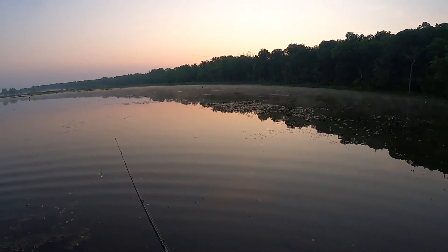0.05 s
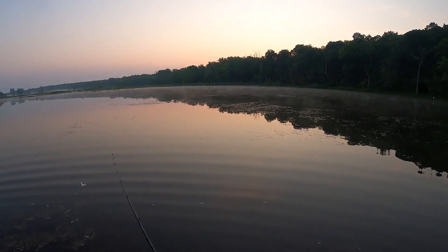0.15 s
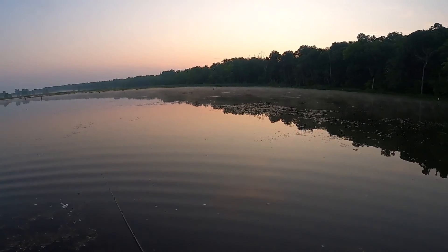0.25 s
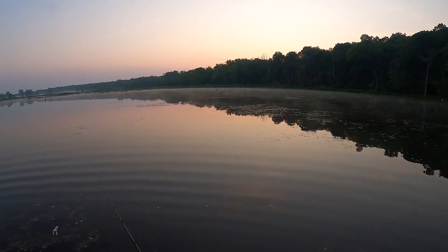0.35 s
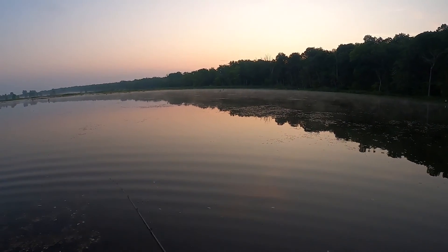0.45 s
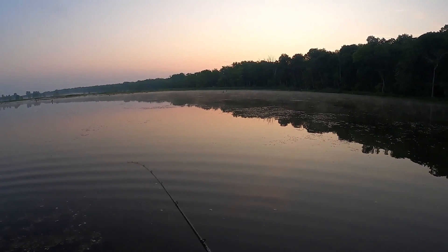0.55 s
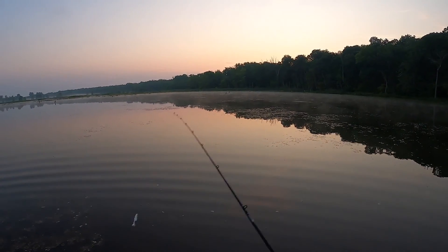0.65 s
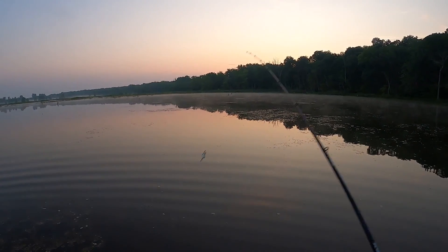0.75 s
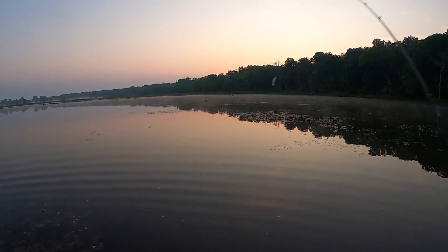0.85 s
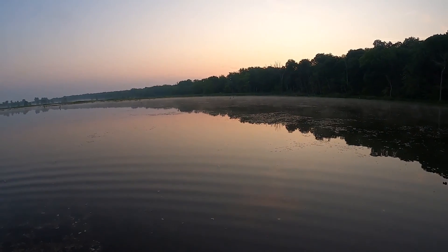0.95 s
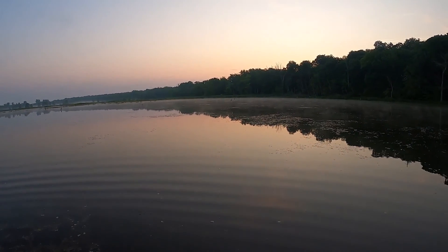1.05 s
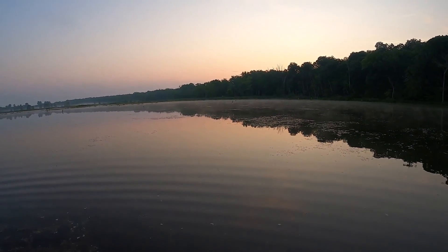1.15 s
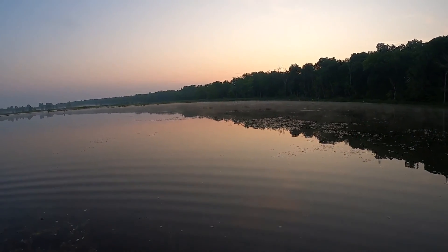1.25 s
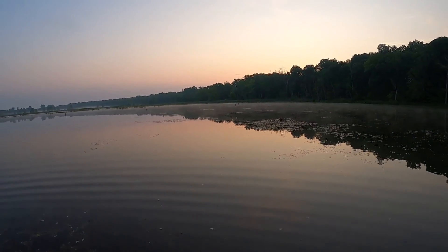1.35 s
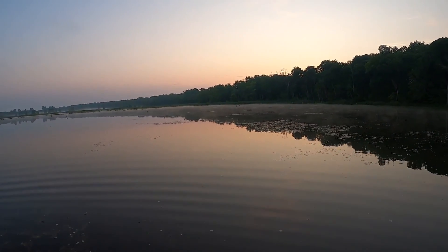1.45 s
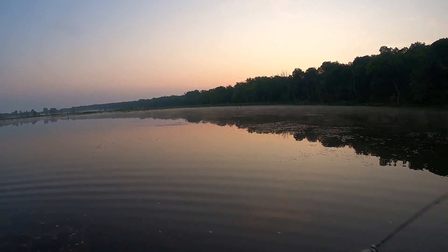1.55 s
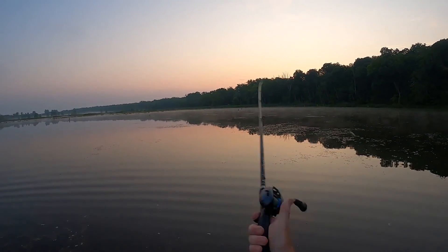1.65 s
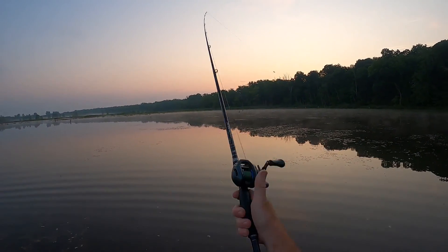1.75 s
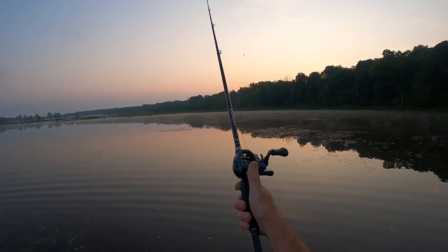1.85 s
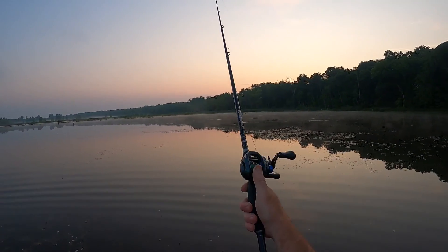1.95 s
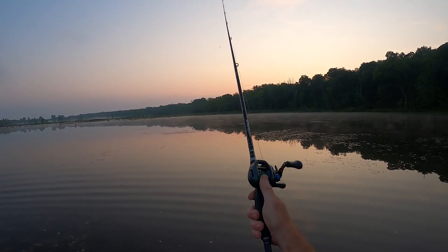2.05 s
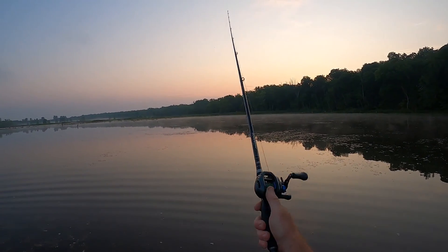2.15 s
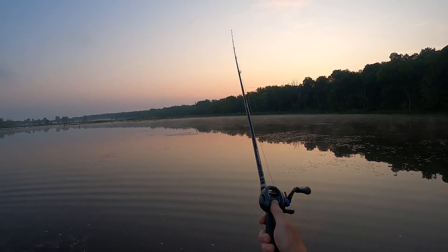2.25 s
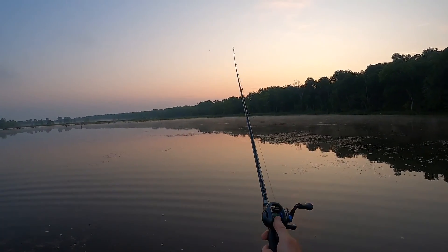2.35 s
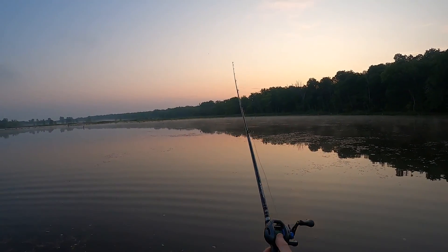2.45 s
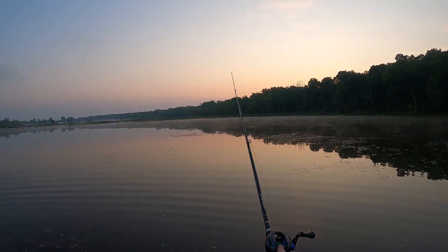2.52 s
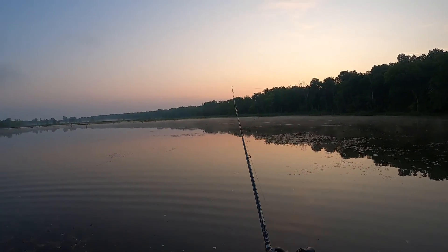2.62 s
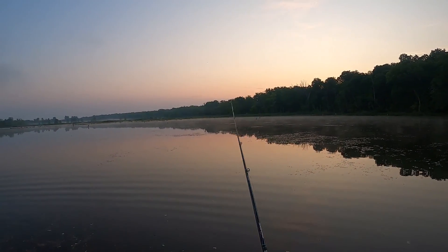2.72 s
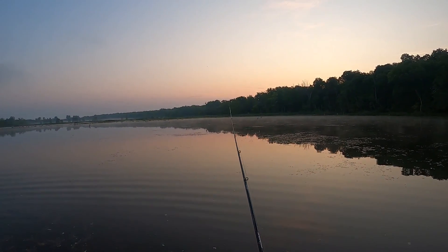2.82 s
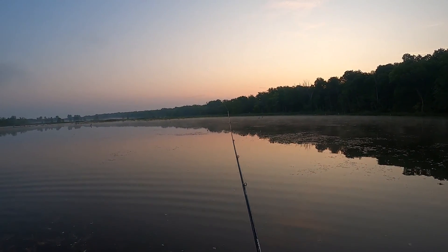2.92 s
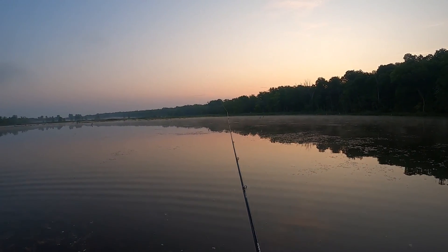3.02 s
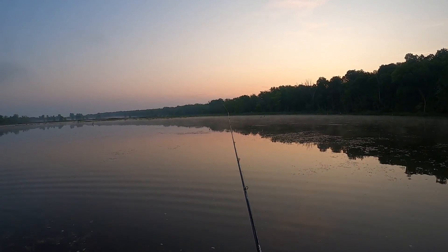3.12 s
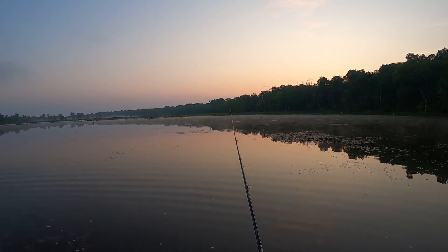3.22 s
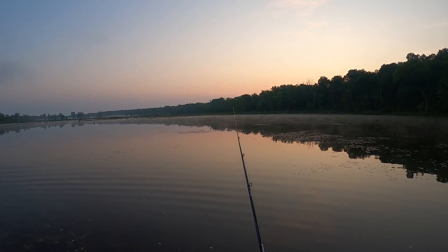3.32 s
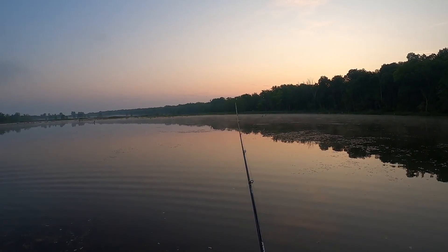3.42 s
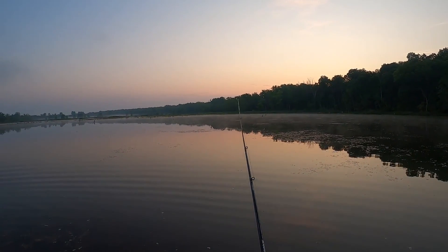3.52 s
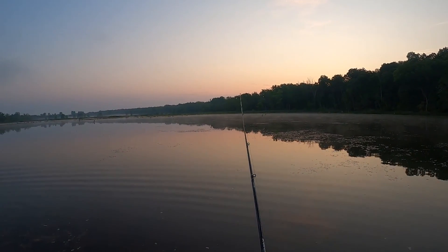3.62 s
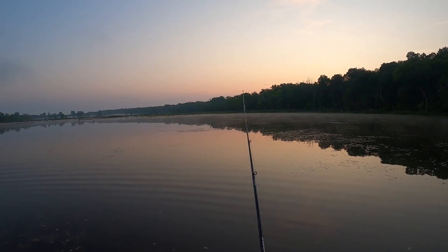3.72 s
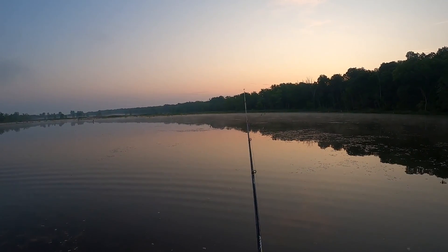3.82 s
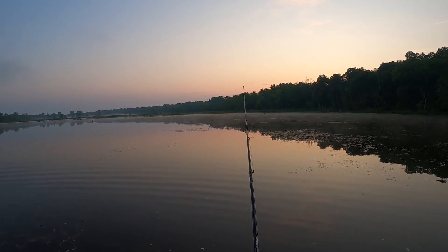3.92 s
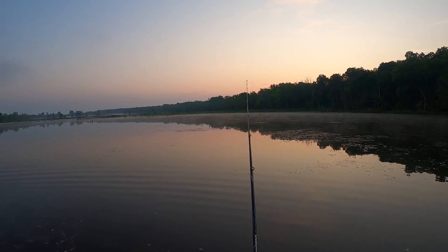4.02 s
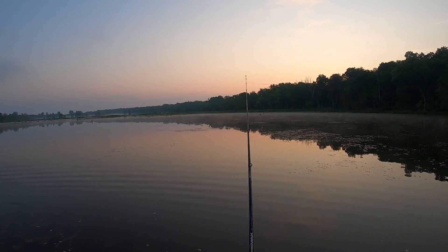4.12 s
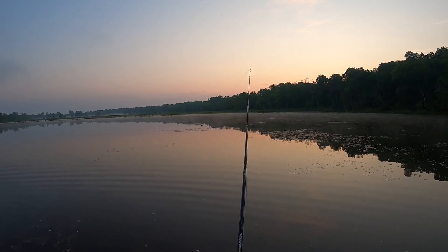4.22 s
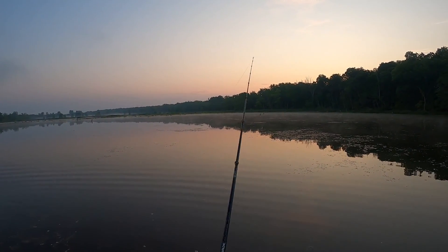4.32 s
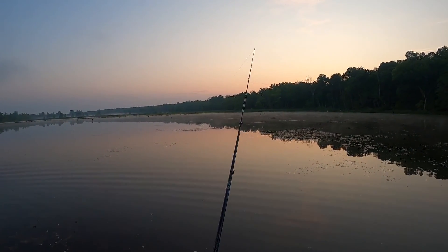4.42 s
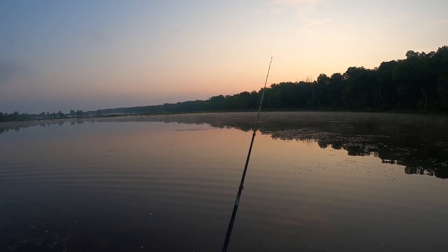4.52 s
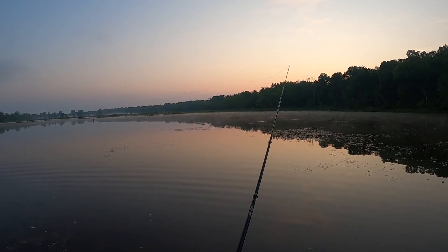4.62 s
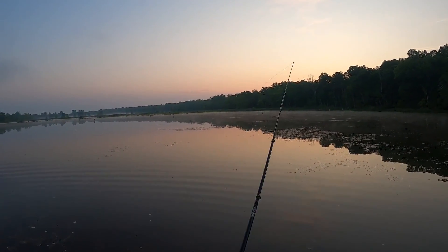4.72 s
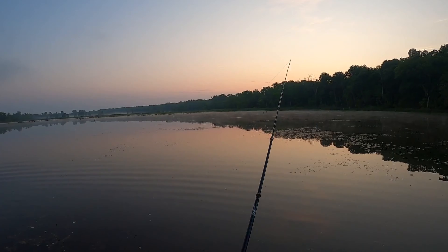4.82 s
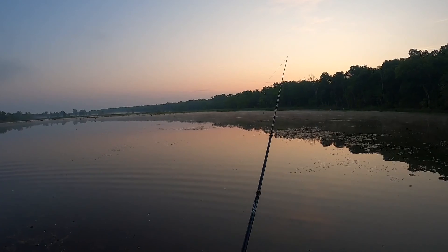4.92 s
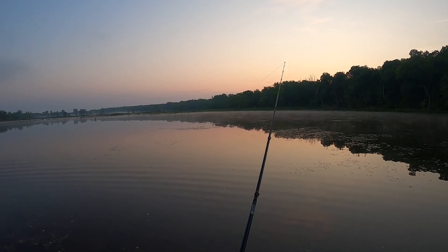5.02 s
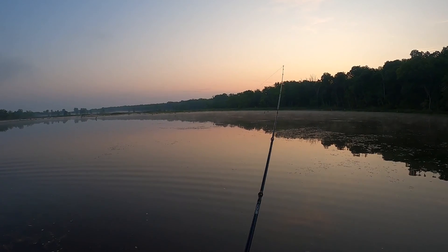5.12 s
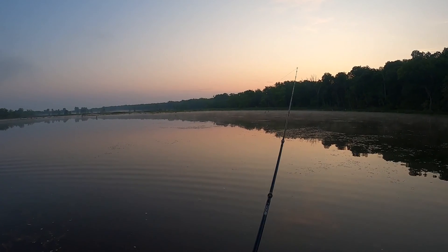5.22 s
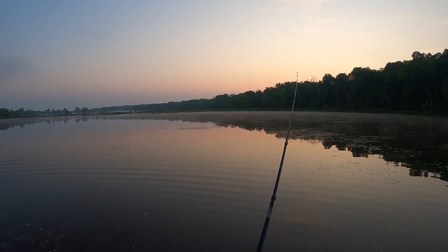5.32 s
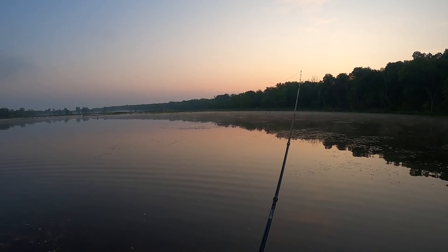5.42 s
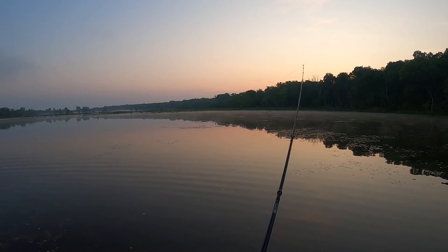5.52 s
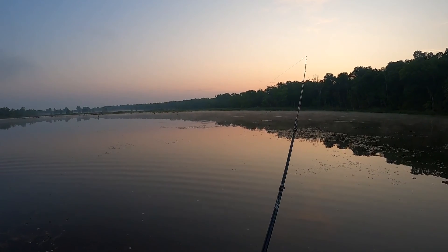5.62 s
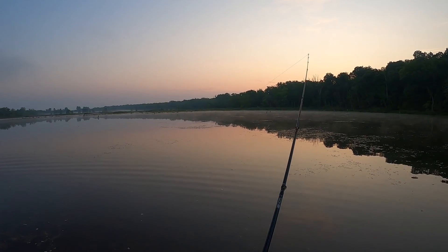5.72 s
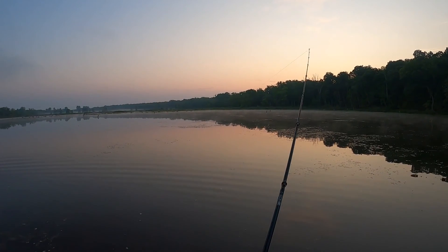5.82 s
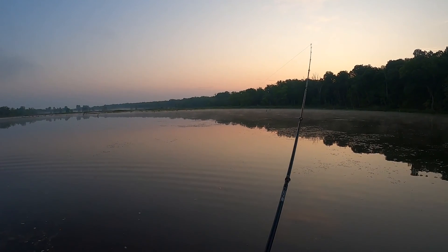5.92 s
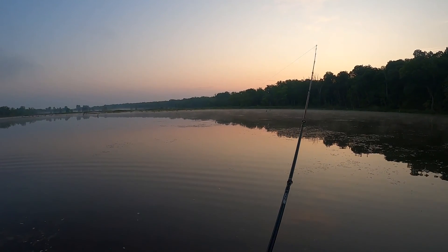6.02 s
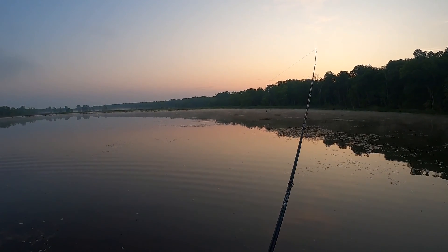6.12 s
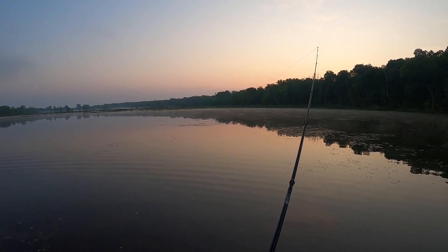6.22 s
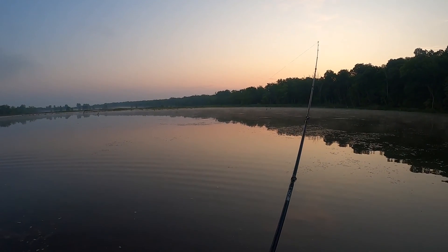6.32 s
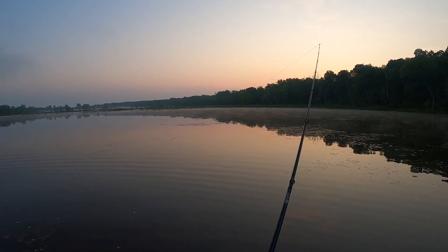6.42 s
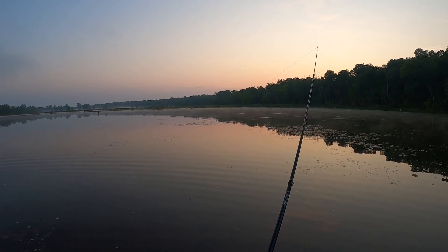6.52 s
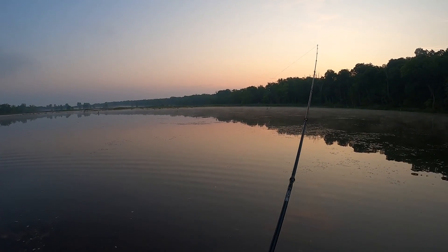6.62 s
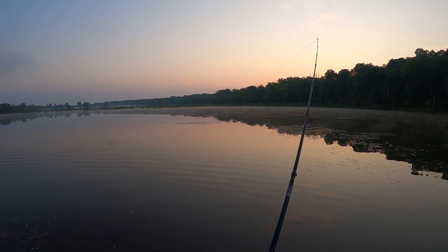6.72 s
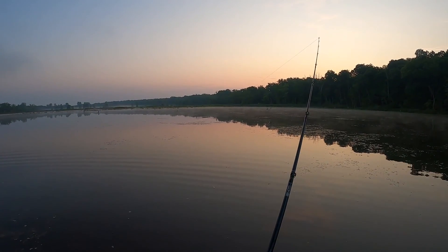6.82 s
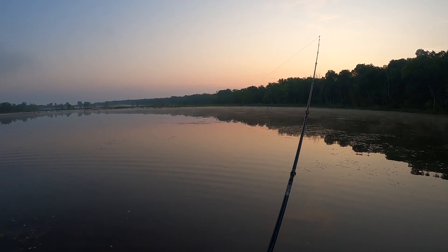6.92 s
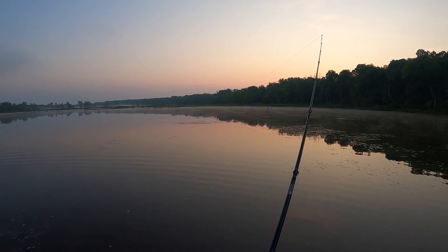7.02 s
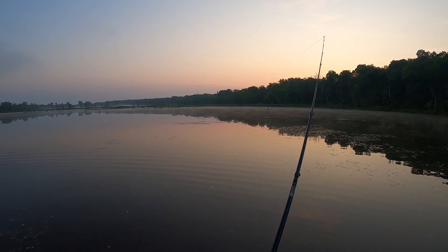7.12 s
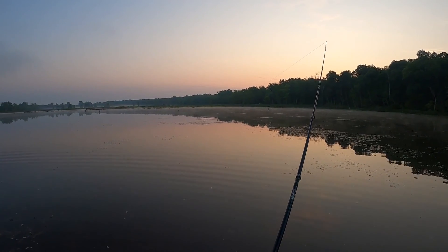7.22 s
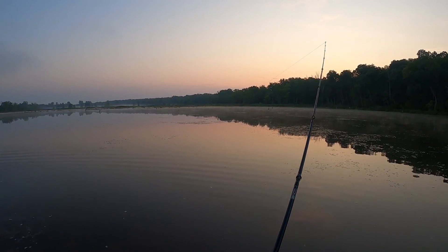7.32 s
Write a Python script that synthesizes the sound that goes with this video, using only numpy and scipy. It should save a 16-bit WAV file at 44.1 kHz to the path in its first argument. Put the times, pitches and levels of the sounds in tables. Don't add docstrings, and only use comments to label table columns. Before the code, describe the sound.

A fishing cast heard from the angler's position: one crisp reel click, cloth rustle, a quick whoosh, then a rattling spool whine sliding down in pitch while line hisses through guides and fades. Light metal ticks and hollow rod taps follow, then the sharpest clack as the gears engage. Soft winding continues. Lake birds, croaking frogs and one far drumming woodpecker sit faintly over deep, uneven engine rumble, nearly mono at first, gradually widening.

```python
import sys
import numpy as np
from scipy import signal
from scipy.fft import rfft, irfft, next_fast_len
from scipy.io import wavfile
from scipy.ndimage import uniform_filter1d, map_coordinates

SR = 44100
rng = np.random.default_rng(int(sys.argv[2]) if len(sys.argv) > 2 else 0)


def gain_from_db(level_db):
    decades = np.asarray(level_db, float) / 20
    return 10 ** decades


def master(y):
    cut = np.clip(np.atleast_2d(y).T, -1, 1)
    pcm = np.round(cut * 32767)
    wavfile.write(sys.argv[1], SR, pcm.astype(np.int16))


N = 324699

# time in seconds, turns per second.
SPIN = [(1.72, 300), (1.796, 300), (1.85, 328), (1.892, 342), (1.98, 305.5), (2.03, 300), (2.075, 278),
        (2.196, 240), (2.33, 221), (2.408, 203), (2.52, 191), (2.612, 172), (2.72, 163.5), (2.86, 141),
        (3.134, 120), (3.47, 99), (3.65, 98), (4.02, 80)]
# order, level in dB, dB per tenfold speed, turns per second below which it is lost.
SHAFT = [(1, -2, 5, 285), (2, 0, 90, 205), (3, -12, 25, 185), (4, -4, 105, 150)]
# centre in Hz, width in Hz, level in dB.
FRAME = [(2200, 200, 1), (2790, 280, 1.5), (3284, 260, -7), (2500, 160, -6), (4900, 120, -16),
         (5000, 150, -25)]
# frequency in Hz, density in dB per Hz.
HISS = [(2120, -32), (3300, -4.5), (4100, -11), (4900, -10), (5510, 0.5), (6340, -10.5), (7580, -14.5),
        (9700, -15.5), (11800, -24.5), (13000, -20), (15700, -44.5)]
# frequency in Hz, density in dB per Hz.
WINDAGE = [(150, -27.5), (300, -3), (700, -8), (1400, 0), (1900, 3), (2600, -25.5), (3600, -20), (4400, -3),
           (5000, -12), (5600, -30)]
# peak in seconds, level in dB, rise and fall in seconds per 20 dB.
JOLTS = [
    (1.745, -40.5, 0.11, 0.023),
    (1.84, -51.5, 0.071, 0.039),
    (2.75, -66.5, 0.13, 0.082),
    (3.8, -70.5, .55, 0.52),
]
# peak in seconds, dB over the hiss, rise and fall in seconds per 20 dB.
SURGES = [
    (2.03, -2, .1, .1),
    (2.22, 2.5, .09, .12),
    (2.41, 2.5, .12, .05),
    (2.53, 1, .05, .05),
    (2.62, 2, .08, .03),
]
# peak in seconds, level in dB, rise and fall in seconds per 20 dB.
GUIDE = (2.6, -61, 1.3, .06)
# peak in seconds, level in dB, rise and fall in seconds per 20 dB, hold in seconds.
BEARING = (3.3, -73, .25, .3, .42)
# start in seconds, length in seconds, from Hz, to Hz, arch in Hz, level in dB.
SQUEALS = [
    (1.99, 0.11, 1274, 1340, -81, -40.5),
    (2.2, 0.026, 1190, 1230, 10, -53.5),
]
# time in seconds, vortex level in dB, vortex pitch in Hz, gust level in dB.
SWISH = [
    (1.58, -80, 695, -70),
    (1.688, -36.5, 890, -44),
    (1.82, -57, 1250, -40),
]
# time in seconds, level in dB, vortex pitch in Hz.
WHIP = [
    (1.28, -92, 3000),
    (1.33, -82, 3300),
    (1.52, -80, 4100),
    (1.62, -63, 4900),
    (1.69, -60, 6900),
    (1.74, -67, 8500),
]
# time in seconds, peak in dB, brightest Hz, decay by 60 dB in seconds.
CLICKS = [(0.2952, -46, 3600, 0.0065), (0.2958, -30, 3400, 0.006), (.3045, -38, 2600, .012),
          (4.071, -52, 2000, .03), (4.093, -52, 1700, .02), (5.021, -36, 2000, .03), (5.03, -44, 1500, .05),
          (5.0095, -26, 2200, .008), (0.2976, -25, 1100, 0.009), (.305, -39, 1000, 0.048),
          (4.0658, -35, 4150, 0.002), (4.0742, -50, 3400, 0.012), (4.079, -49, 2600, 0.02),
          (4.089, -50, 1700, 0.03), (4.066, -35.5, 1400, 0.006), (4.327, -49, 5850, 0.013),
          (4.067, -47, 900, .01), (.2968, -22, 2500, 0.007), (4.5086, -48.5, 3270, 0.0063),
          (4.528, -60, 4000, .015), (.3005, -42, 2600, 0.02), (4.6177, -51, 6650, 0.005),
          (4.627, -63, 2800, 0.0079), (4.9627, -55, 2500, 0.013), (4.9912, -39, 2100, 0.012),
          (4.998, -40, 2000, 0.027), (5.0081, -17, 2100, 0.0088), (5.0107, -10, 2300, 0.011),
          (5.0107, -14.5, 6300, .008), (5.012, -26, 1100, 0.018), (.2978, -36, 750, 0.022),
          (0.3009, -38.5, 2830, .03), (.285, -58, 2800, 0.12), (5.0123, -17, 2100, 0.015),
          (5.013, -18, 4500, 0.008), (5.017, -29, 1900, 0.025)]
# centre in Hz, width in Hz, level in dB.
METAL = [(1600, 540, 8), (2930, 490, -4.5), (3740, 55, -29.5), (5000, 1200, -2.5), (5700, 150, -23),
         (8050, 880, -12), (9350, 87, -19)]
# time in seconds, peak in dB, ring in Hz, thud in dB, thud in Hz.
KNOCKS = [
    (0.2965, -35, 853, -45.5, 416),
    (.472, -61, 686, -50, 440),
    (4.7569, -32.5, 1135, -51, 260),
    (4.804, -40, 1173, -48, 265),
    (5.0115, -31.5, 868, -40, 351),
]
# time in seconds, peak in dB, ring in Hz, thud in dB, thud in Hz.
SLAPS = [
    (2.8112, -34.5, 1170, -37, 211),
    (3.432, -70, 900, -46.5, 306),
    (2.69, -52, 600, -56, 330),
    (2.24, -48, 950, -70, 400),
]
# time in
# seconds, peak in dB, pitch in Hz, decay by 60 dB in seconds.
TICKS = [(4.055, -62, 4800, .01), (4.086, -58, 5500, .008), (4.149, -66, 6000, .006),
         (4.156, -62, 6800, .01), (4.194, -68, 7000, .012), (4.218, -69, 7000, .006),
         (4.295, -68, 7000, .006), (4.303, -68, 8500, .006), (4.311, -65, 7500, .006),
         (4.365, -68, 8000, .006), (4.385, -69, 8500, .006), (4.407, -67, 7000, .006),
         (4.414, -65, 9000, .006), (4.456, -64, 8800, .006), (4.483, -67, 5000, .008),
         (4.52, -66, 7000, .006), (4.53, -64, 7000, .01), (4.54, -67, 7500, .006), (4.572, -69, 8000, .006),
         (4.628, -60, 4000, .008), (4.704, -71, 8000, .006), (4.739, -69, 4500, .008),
         (4.7565, -52, 3100, .012), (4.804, -66, 6800, .02), (5.008, -24, 8200, .005),
         (4.9912, -46, 6900, .007), (4.9912, -43, 4700, .008), (5.008, -28, 4800, .005),
         (4.0659, -40, 8000, .0015), (4.0659, -49, 11000, .0015), (4.0755, -64, 8300, .008),
         (5.0125, -24, 8300, .008), (4.583, -60, 2400, .015), (4.627, -56, 1200, .02),
         (4.655, -60, 1700, .02), (4.53, -60, 2200, .02), (4.327, -60, 2000, .015), (4.425, -60, 2500, .02),
         (5.0108, -21, 7300, .006), (5.0125, -33, 10000, .006), (.2962, -32, 3200, .005),
         (.297, -38, 8600, .005), (4.098, -60, 1600, .02)]
# peak in seconds, level in dB, rise and fall in seconds per 20 dB.
GEARS = [
    (5.1, -85.5, .22, 0.56),
    (5.8, -73.5, 0.47, 50),
]
# frequency in Hz, density in dB per Hz.
MESH = [(4300, -23), (5000, -4.5), (5450, 2.5), (5800, -3.5), (6300, -12), (6800, -0.5), (7200, -17),
        (8000, -53)]
# peak in seconds, level in dB, rise and fall in seconds per 20 dB.
CLOTH = [
    (.08, -85, 0.16, 0.21),
    (.58, -75.5, .5, 0.12),
    (1.1, -79.5, 0.45, 0.41),
    (3.93, -70.5, .9, 0.093),
    (4.35, -80, 1.5, 1.0),
    (5.1, -78.5, 0.24, 40),
]
# frequency in Hz, density in dB per Hz.
RUSTLE = [(2820, -30), (4800, -7), (5140, -3.5), (6870, -2), (7540, -8.5), (8560, -9.5), (12000, -34),
          (15500, -32.5)]
# centre in Hz, width in Hz, level in dB.
TRUNK = [(980, 750, -7.5), (1412, 860, -5), (1800, 114, -5.5)]
# start in seconds, held seconds, level in dB, throat in Hz.
BROAD = [
    (.19, 0.39, -64.5, 1210),
    (4.82, 0.4, -64.5, 1200),
    (5.64, 0.14, -80, 1253),
    (6.0, 0.54, -77.5, 1220),
    (7.17, .3, -64, 1160),
]
# start in seconds, held seconds, level in dB, throat in Hz.
NARROW = [(1.056, .045, -67, 1350), (1.122, .01, -64, 1340), (1.151, .035, -62, 1360),
          (1.213, .008, -69, 1330), (1.252, .012, -59.5, 1350), (1.295, .035, -71, 1340),
          (1.36, .02, -69, 1320), (1.395, .015, -74, 1330), (1.439, .01, -67, 1330), (1.48, .02, -73, 1330),
          (1.525, .015, -68, 1350), (1.59, .02, -69, 1310)]
# start in seconds, length in seconds, pitch in Hz, arch in Hz, level in dB.
NOTES = [(5.03, .13, 1810, -21, -63), (3.132, 0.13, 2300, 7, -68), (3.12, 0.09, 4450, 100, -75),
         (3.26, 0.15, 4140, -19, -68), (3.65, 0.16, 4070, 9, -72), (4.3, .12, 2560, 20, -72),
         (4.56, .06, 2000, 30, -70), (5.3, .1, 2400, 20, -72), (3.92, .06, 1920, 40, -68),
         (3.6, .06, 2950, 40, -72), (3.2, .13, 2290, 10, -71), (0.054, 0.11, 2080, 16, -79),
         (.65, .13, 4130, 19, -85), (3.75, .23, 1970, -170, -72), (4.419, 0.55, 2720, 72.5, -71),
         (4.946, .055, 6900, 39, -77), (5.21, 0.061, 3200, 171, -64.5), (1.34, 0.14, 5850, -28, -83),
         (0.11, 0.26, 4850, 33, -80), (4.452, .03, 4880, 20, -71), (4.16, .12, 3600, 20, -80),
         (5.13, .07, 1800, 150, -70)]
# start in seconds, length in seconds, from Hz, to Hz, level in dB.
SLIDES = [(0.743, .055, 3500, 5800, -76), (4.088, 0.04, 4200, 3500, -64), (4.385, .085, 4250, 2300, -67.5),
          (4.7, 0.045, 4400, 3200, -67.5), (6.668, 0.093, 4090, 5600, -72), (6.73, .04, 4700, 3600, -74),
          (6.92, 0.032, 5000, 4100, -69), (7.072, 0.025, 4350, 4000, -74), (7.186, .035, 5230, 3930, -68.5),
          (4.005, .045, 4600, 4000, -76), (7.337, 0.038, 4010, 4330, -71), (3.009, 0.1, 3840, 4550, -67.5),
          (3.205, 0.065, 4400, 3800, -66), (4.19, 0.065, 1800, 2080, -67), (4.51, .065, 1800, 2080, -67),
          (4.81, 0.065, 1780, 2050, -62.5), (5.114, 0.074, 2600, 2800, -64.5),
          (3.79, 0.048, 4000, 3200, -68), (4.48, .04, 1700, 1800, -71), (4.47, .1, 3300, 3300, -77),
          (4.13, .03, 2900, 2500, -70)]
# frequency in Hz, decay by 60 dB in seconds.
SHORE = [(200, 0.63), (1500, 0.51), (8000, 0.0406)]
# frequency in Hz, density in dB per Hz.
CHORUS = [(250, 2), (450, -10), (1100, -3.5), (1700, -5.5), (2600, -6), (3100, -16.5), (5000, -54)]
# peak in seconds, level in dB, rise and fall in seconds per
# 20 dB.
STIRS = [
    (.59, -67, 0.56, 0.098),
    (3.87, -73.5, 0.94, 0.76),
    (5.1, -67.5, 0.74, 0.39),
]
# frequency in Hz, density in dB per Hz.
WARBLE = [(2300, -40), (3000, 0), (3800, -4.5), (4700, -5), (5400, -16.5), (8000, -48)]
# peak in seconds, level in dB, rise and fall in seconds per 20 dB.
FLOCKS = [(.46, -71.5, .6, 0.46), (1.0, -74, 0.61, 0.93), (1.5, -73.5, 0.68, .5), (3.65, -76, 1.5, 0.47),
          (4.55, -72, 1, 1.36), (7.36, -76.5, 2.3, .3)]
# peak in seconds, share in dB, rise and fall in seconds per 20 dB, hold in seconds.
DULL = (4.65, -1.5, 1.5, 1.5, .3)
# frequency in Hz, density in dB per Hz.
RUMBLE = [(12, -34), (20, -15), (92, -5), (135, -7.5), (198, -14), (229, -18), (290, -27), (357, -30.5),
          (604, -39.5), (900, -45), (1170, -60.5), (1980, -120)]
# peak in seconds, level in dB, rise and fall in seconds per 20 dB.
TRAFFIC = [(0.02, -55, 0.31, .4), (1.68, -50, 0.24, 0.17), (4.55, -54, 1.0, 0.8), (6.3, -56.5, 1.2, 1),
           (7.2, -54, 1.2, 2)]
# peak in seconds, level in dB, rise and fall in seconds per 20 dB, hold in seconds.
DRONE = [(.06, -49, .3, .22, .06), (.3, -53, .1, .12, .98), (1.55, -53, .25, .2, .25),
         (2.15, -56, .3, .5, .5), (3.2, -56, .3, .6, .2), (3.9, -58, .4, .4, .3), (4.4, -53, .2, .1, .6),
         (5.1, -58, .2, .1, .18), (5.85, -54, .4, .12, .08), (6.55, -59, .6, .3, .45),
         (7.24, -58, .15, .2, 0)]
# frequency in Hz, side below mid in dB.
WIDE = [(60, -20.5), (110, -25), (200, -15), (380, -9), (700, -8.5), (1290, -9), (2380, -9), (4400, -1.5),
        (8120, -6.5), (15000, 0)]

FAST = 300
RATTLE_DB, RATTLE_SLOPE, HISS_DB, HISS_SLOPE = -50.5, 48.4, -56.5, 38.4
FREE_S, RUN_S = [(1.72,), (3.38,)], [(1.7,), (4.0,)]
FIZZ_S = [(2.6,), (4.3,)]
LET_GO_S = [(1.62,), (4.1,)]
TAUT_S, TAUT_WIDTH_S, TAUT_SHARE = 2.6, .95, .86
HUM_DB, HUM_RATE, HUM_S = -54, 330, [(1.74,), (2.9,)]
LEFT_DB, LEFT_PER_OCTAVE_DB = 2.2, -2.5
KNOCK_T60, SLAP_T60 = 0.041, 0.006
ROLL_S, GAP_S, QUICKEN_S, BLOWS = 5.9745, .082, .00108, 19
PECK_DB, TIRE_DB, LAST_DB = -4.5, .2, -4
BROAD_THROAT = (370, .13, 0.36, 2.4)
NARROW_THROAT = (215, .007, 0.03, .8)
TRAFFIC_DB, CHORUS_DB, WARBLE_DB, CLOTH_DB = -54.5, -69, -82.5, -100.5
DRONE_HZ, DRONE_WIDTH, DRONE_DB = 74, 55, -66
SHUT_DB, OPEN_S, MUFFLE = -42.5, 2.61, 0.22
TOP_HZ = 15800


def unit(x):
    return x / np.sqrt(np.mean(x ** 2) + 1e-20)


def along(points, hz):
    f, v = np.transpose(points)
    return np.interp(np.log(hz + 1), np.log(f + 1), v)


def curves(rows):
    s, *cols = np.transpose(rows)
    return [np.interp(np.arange(N) / SR, s, c) for c in cols]


def gate(rows, fade=0.011):
    t = np.arange(N) / SR
    return np.clip(np.minimum(t - rows[0][0], rows[-1][0] - t) / fade, 0, 1)


def swell(s, db, rise, fall, hold=0):
    t = np.arange(N) / SR
    return gain_from_db(db - 20 * np.maximum(0, np.maximum((s - t) / rise, (t - s - hold) / fall)))


def swells(rows, floor_db):
    return np.sqrt(gain_from_db(floor_db) ** 2 + sum(swell(*row) ** 2 for row in rows))


def wobble(rate):
    return map_coordinates(rng.standard_normal(int(N * rate / SR) + 4), [np.arange(N) * rate / SR])


def filtered(x, response):
    m = next_fast_len(x.shape[-1] + 8192)
    return irfft(rfft(x, m) * response(np.fft.rfftfreq(m, 1 / SR)), m)[..., :x.shape[-1]]


def modes(peaks):
    def response(f):
        return sum((-1) ** k * gain_from_db(db) * 1j * f * w / (c * c - f * f + 1j * f * w)
                   for k, (c, w, db) in enumerate(peaks))
    return response


def moving(x, hz, width):
    spin = np.exp(2j * np.pi * np.cumsum(hz) / SR)
    b, a = signal.butter(2, width / SR)
    return (signal.lfilter(b, a, x / spin) * spin).real


def pulses(rate, jitter, scatter_db):
    turns = np.cumsum(rate) / SR
    at = np.interp(np.arange(1, int(turns[-1])), turns, np.arange(N))
    at = at + jitter * SR / rate[at.astype(int)] * rng.standard_normal(len(at))
    at = np.clip(at, 8, N - 9)
    taps = at.astype(int)[:, None] + np.arange(-7, 9)
    offset = taps - at[:, None]
    shape = np.sinc(offset) * np.cos(np.pi * offset / 16) ** 2
    strength = gain_from_db(scatter_db * rng.standard_normal((len(at), 1)))
    return np.bincount(taps.ravel(), (shape * strength).ravel(), N), turns


def whistles(calls, waver, flutter_db, edge):
    out, shake, flutter = np.zeros(N), 1 + waver * wobble(90), gain_from_db(flutter_db * wobble(60))
    for s, length, from_hz, to_hz, arch_hz, db in calls:
        at = np.arange(round(s * SR), min(round((s + length) * SR), N))
        u = (at / SR - s) / length
        bow = np.abs(np.sin(np.pi * u))
        hz = from_hz + (to_hz - from_hz) * u + arch_hz * bow
        phase = 2 * np.pi * np.cumsum(hz * shake[at]) / SR
        out[at] += gain_from_db(db) * flutter[at] * bow ** edge * np.sin(phase)
    return out


def frame_rattle(knock, scrape):
    def body(x):
        return filtered(x, lambda f: modes(FRAME)(f) * f ** 2 / (f ** 2 + 1600 ** 2)
                        / (1 + 1j * f / 3900 - (f / 3900) ** 2))
    regular = TAUT_SHARE * np.exp(-((np.arange(N) / SR - TAUT_S) / TAUT_WIDTH_S) ** 2)
    uneven = gain_from_db(1.8 * wobble(35) + .8 * wobble(12))
    return np.sqrt(regular) * unit(body(uneven * knock)) + np.sqrt(1 - regular) * unit(body(scrape))


def line_hiss(pace, scrape):
    hiss = swells(SURGES, -.8) * unit(filtered(scrape, lambda f: gain_from_db(along(HISS, f))))
    fizz = filtered(hiss, lambda f: 1 / (1 + (7500 / (f + 1)) ** 8))
    return hiss + gain_from_db(-30 * pace - 17.5) * gate(FIZZ_S, fade=.3) * fizz


def shaft_hum(speed, turns):
    hum = np.zeros(N)
    for order, db, slope, low in SHAFT:
        level = gain_from_db(db + slope * np.log10(speed / HUM_RATE) + 2.5 * wobble(22))
        hum += level / (1 + (low / speed) ** 20) * np.sin(2 * np.pi * order * turns)
    return gain_from_db(HUM_DB) * gate(HUM_S, fade=0.053) * hum


def spool():
    speed = curves(SPIN)[0] * (1 + .0014 * wobble(20) + .002 * wobble(7))
    pace = np.log10(speed / FAST)
    knock, turns = pulses(speed, jitter=.006, scatter_db=2.4)
    beat = 1 + .5 * np.cos(2 * np.pi * turns) * gate(RUN_S, fade=0.059)
    traverse = np.sin(2 * np.pi * turns / 37)
    scrape = beat * gain_from_db(1.2 * wobble(45) + 1.0 * traverse) * rng.standard_normal((2, N))

    rattle = frame_rattle(knock / np.sqrt(speed), scrape[0])
    windage = unit(filtered(rng.standard_normal(N), lambda f: gain_from_db(along(WINDAGE, f))))
    shake = gain_from_db(RATTLE_DB + RATTLE_SLOPE * pace) * gate(FREE_S, fade=0.026)
    shake = shake + swells(JOLTS, -110) * gate(LET_GO_S, fade=0.075)
    near = shake * (rattle + 0.51 * gain_from_db(18 * pace) * windage)

    rub = gain_from_db(HISS_DB + HISS_SLOPE * pace) * gate(RUN_S, fade=0.029)
    rub = rub + 0.39 * swell(*JOLTS[0]) + 1.1 * swell(*JOLTS[1])
    hiss = rub * line_hiss(pace, scrape[1])

    slap = unit(filtered(knock + 0.042 * scrape[0], lambda f: modes([(1420, 520, 0)])(f) ** 2))
    half_turns = pulses(2 * speed, jitter=.001, scatter_db=1)[0] / np.sqrt(speed)
    tick = unit(filtered(half_turns, lambda f: modes([(5550, 900, 0)])(f) ** 2))
    small = swell(*GUIDE) * gate(RUN_S, fade=0.57) * slap + swell(*BEARING) * tick
    return near + hiss + shaft_hum(speed, turns) + small


def brake():
    return whistles(SQUEALS, waver=.002, flutter_db=1.2, edge=.45)


def swish():
    db, hz, gust_db = curves(SWISH)
    vortex = unit(moving(rng.standard_normal(N), hz, width=480))
    gust = unit(filtered(rng.standard_normal(N), modes([(35.3, 12, 0)])))
    stroke = gate(SWISH, fade=0.0045) * (gain_from_db(db) * vortex + gain_from_db(gust_db) * gust)
    whip_db, whip_hz = curves(WHIP)
    whip = moving(rng.standard_normal(N), whip_hz, width=1800)
    whip = unit(moving(whip, whip_hz, width=1800))
    return stroke + gain_from_db(whip_db) * gate(WHIP, fade=.03) * whip


def clicks():
    def edges(f):
        return (1j * f / 350) / (1 + 1j * f / 350) / (1 + 1j * f / 8500 - (f / 8500) ** 2) ** 4

    out, t = np.zeros((2, N + SR)), np.arange(SR // 12) / SR
    for s, db, hz, t60 in CLICKS:
        decay = gain_from_db(-60 * t / max(t60, .001)) + 0.009 * gain_from_db(-60 * t / 0.047)
        burst = rng.standard_normal(len(t)) * decay * (1 - np.exp(-t / 0.0003))
        burst = burst + 3.5 * (t == t[9])
        click = filtered(burst, lambda f: (.07 * modes(METAL)(f) + modes([(hz, .9 * hz, 0)])(f) ** 2) * edges(f))
        pan_db = LEFT_DB + LEFT_PER_OCTAVE_DB * np.log2(hz / 2000)
        gain = gain_from_db(db + np.array([[.5], [-.5]]) * pan_db)
        out[:, round(s * SR):][:, :len(t)] += gain * click / np.abs(click).max()
    return out[:, :N]


def knocks():
    out, t = np.zeros(N + SR), np.arange(SR // 8) / SR
    blows = [(*row, KNOCK_T60) for row in KNOCKS] + [(*row, SLAP_T60) for row in SLAPS]
    for s, db, hz, thud_db, thud_hz, t60 in blows:
        ring = gain_from_db(db - 60 * t / t60) * np.sin(2 * np.pi * hz * t)
        thud = gain_from_db(thud_db - 60 * t / 0.065) * np.sin(2 * np.pi * thud_hz * (t - .0024))
        thud = thud * (1 - np.exp(-t / 0.00038))
        grain = uniform_filter1d(uniform_filter1d(rng.standard_normal(len(t)), size=4), size=3)
        crack = gain_from_db(db - 31.0 - 60 * t / .004) * grain
        out[round(s * SR):][:len(t)] += ring + thud + crack
    return filtered(out[:N], lambda f: 1 / (1 + 1j * f / 4500 - (f / 4500) ** 2) ** 2)


def ticks():
    out, t = np.zeros(N + SR), np.arange(SR // 40) / SR
    for s, db, hz, t60 in TICKS:
        puff = rng.standard_normal(len(t)) * gain_from_db(-60 * t / max(t60, .001)) * (1 - np.exp(-t / .0006)) ** 2
        tick = filtered(puff, lambda f: modes([(hz, .45 * hz, 0)])(f) ** 3)
        out[round(s * SR):][:len(t)] += gain_from_db(db) * tick / np.abs(tick).max()
    return out[:N]


def woodpecker():
    blows, k = np.zeros(N), np.arange(BLOWS)
    at = ROLL_S + GAP_S * k - QUICKEN_S * k * (k - 1) / 2
    db = PECK_DB - TIRE_DB * k + LAST_DB * (k == k[-1]) + .9 * rng.standard_normal(BLOWS)
    blows[(at * SR).astype(int)] = gain_from_db(db)

    def trunk(f):
        wood = modes(TRUNK)(f) * modes([(1300, 1500, 0)])(f) / (1 + 1j * f / 3000) ** 2
        return wood + modes([(330, 160, -9)])(f) / (1 + 1j * f / 600)
    return filtered(blows, trunk)


def frogs():
    out = np.zeros(N)
    for rows, (width, rise, fall, flutter_db) in [(BROAD, BROAD_THROAT), (NARROW, NARROW_THROAT)]:
        hz = curves(rows)[-1] * (1 + .02 * wobble(9))
        throat = pulses(95 + 12 * wobble(5), jitter=.15, scatter_db=3)[0]
        smear = unit(moving(rng.standard_normal(N), hz, width))
        croak = unit(moving(throat, hz, width)) + 0.74 * smear
        level = sum(swell(s, db, rise, fall, held) for s, held, db, _ in rows)
        out += level * gain_from_db(flutter_db * wobble(14)) * croak
    return out


def birds():
    calls = [(s, length, hz, hz, arch, db) for s, length, hz, arch, db in NOTES]
    calls += [(s, length, start, end, 0, db) for s, length, start, end, db in SLIDES]
    return gain_from_db(-3) * whistles(calls, waver=.009, flutter_db=2.5, edge=.5)


def shore(x):
    hz, t, z = signal.stft(rng.standard_normal((2, SR // 2)), SR, nperseg=256)
    tail = signal.istft(z * gain_from_db(-60 * t / along(SHORE, hz)[:, None]), SR, nperseg=256)[1]
    mid, side = signal.fftconvolve(x[None], tail / np.linalg.norm(tail[0]), axes=1)[:, :N]
    return np.array([mid + .3 * side, mid - .3 * side])


def spread(x):
    side = filtered(np.pad(x, (57, 0))[:N], lambda hz: gain_from_db(along(WIDE, hz)))
    return np.array([x + side, x - side])


def opening():
    return SHUT_DB * np.exp(-(np.arange(N) / SR / OPEN_S) ** 2)


def rush(spectrum, patchy_db):
    z = signal.stft(rng.standard_normal((2, N)), nperseg=512)[2]
    field = uniform_filter1d(uniform_filter1d(rng.standard_normal(z.shape[1:]), 5, 0), 10, 1)
    pair = signal.istft(z * gain_from_db(patchy_db * unit(field)), nperseg=512)[1][:, :N]
    mid, side = filtered(pair, lambda hz: gain_from_db(along(spectrum, hz) + [0 * hz, along(WIDE, hz)]))
    return np.array([mid + side, mid - side]) / np.sqrt(np.mean(mid ** 2))


def gears():
    return swells(GEARS, -100) * rush(MESH, patchy_db=2.0)


def cloth():
    return swells(CLOTH, CLOTH_DB) * gain_from_db(0.71 * wobble(30)) * rush(RUSTLE, patchy_db=0.2)


def dawn_chorus():
    low_level = swells(STIRS, CHORUS_DB - 6.0 + MUFFLE * opening()) * gain_from_db(7.5)
    low = low_level * rush(CHORUS, patchy_db=2.5)
    high = swells(FLOCKS, WARBLE_DB) * rush(WARBLE, patchy_db=2.2)
    top = filtered(high, lambda hz: 1 / (1 + (3700 / (hz + 1)) ** 12))
    return low + high - np.minimum(swell(*DULL), 1) * top


def traffic():
    return swells(TRAFFIC, TRAFFIC_DB) * gain_from_db(1.1 * wobble(4.034) + 2.1 * wobble(9)) * rush(RUMBLE, patchy_db=1.5)


def drone():
    noise = rng.standard_normal((2, N))
    mid, side = filtered(noise, lambda f: modes([(DRONE_HZ, DRONE_WIDTH, 0)])(f) ** 2)
    pair = unit(np.array([mid + .1 * side, mid - .1 * side]))
    return swells(DRONE, DRONE_DB) * gain_from_db(1.5 * wobble(8)) * pair


def scene():
    snap, drum, croaks, song = clicks(), woodpecker(), frogs(), birds()
    wet = shore(gain_from_db(-31.5) * snap.mean(0) + gain_from_db(-16) * drum + gain_from_db(-11) * croaks + gain_from_db(-8) * song)
    near = spool() + brake() + swish() + ticks()
    background = gears() + cloth() + dawn_chorus() + traffic() + drone()
    return snap + knocks() + spread(near + drum + croaks + song) + wet + background


def low_pass(x):
    return signal.sosfilt(signal.butter(12, 15830, fs=SR, output="sos"), x)


def record(dry):
    mid, side = (dry[0] + dry[1]) / 2, (dry[0] - dry[1]) / 2
    top = filtered(side, lambda hz: 1 / (1 + (9500 / (hz + 1)) ** 12))
    side = top + gain_from_db(opening()) * (side - top)
    pair = np.array([mid + side, mid - side]) + gain_from_db(-96.0) * rng.standard_normal((2, N))
    mix = filtered(pair, lambda hz: hz < TOP_HZ)
    return low_pass(mix)


dry = scene()
out = record(dry)
master(out)
```